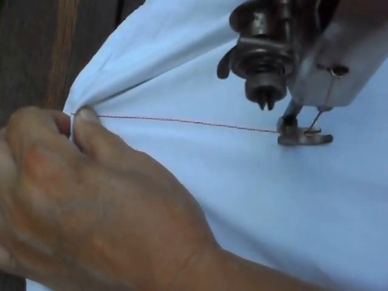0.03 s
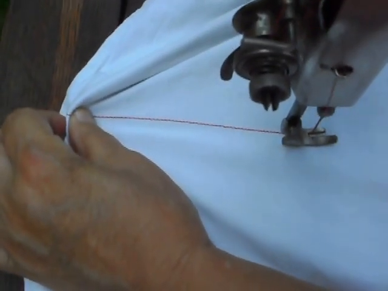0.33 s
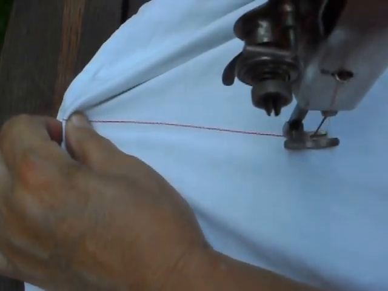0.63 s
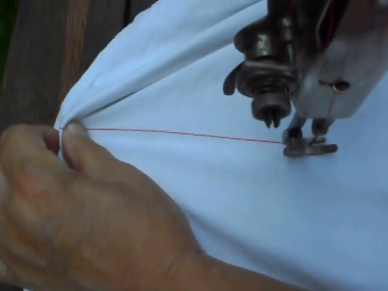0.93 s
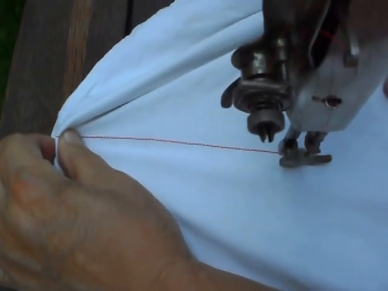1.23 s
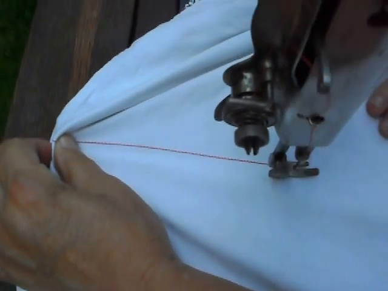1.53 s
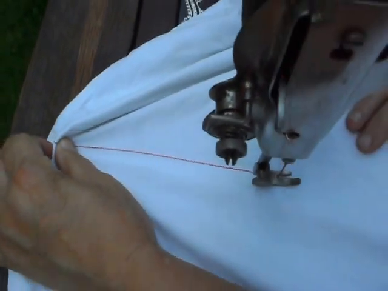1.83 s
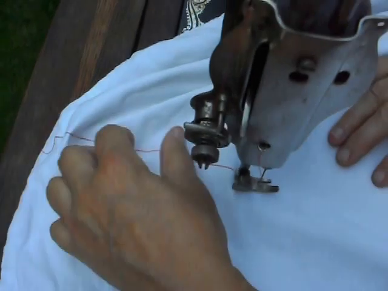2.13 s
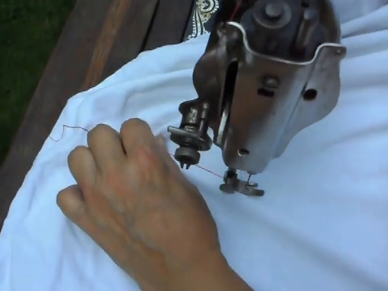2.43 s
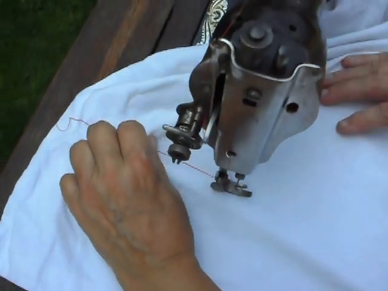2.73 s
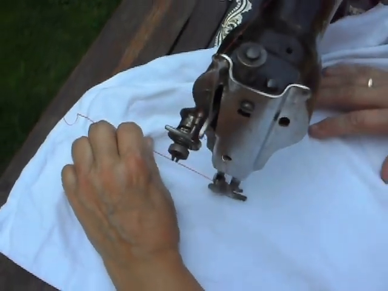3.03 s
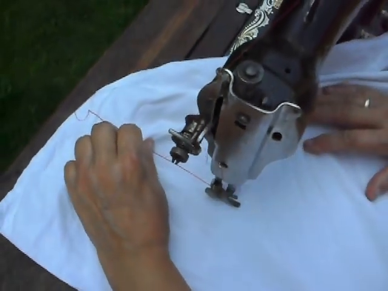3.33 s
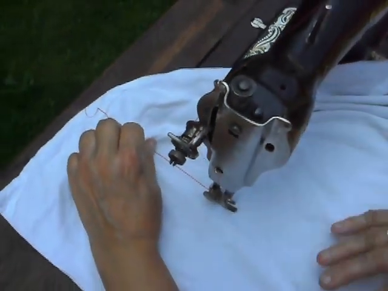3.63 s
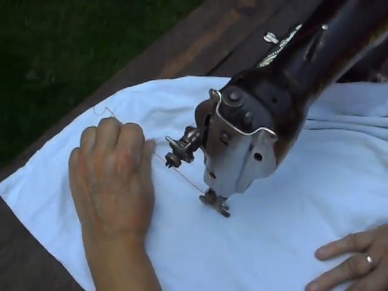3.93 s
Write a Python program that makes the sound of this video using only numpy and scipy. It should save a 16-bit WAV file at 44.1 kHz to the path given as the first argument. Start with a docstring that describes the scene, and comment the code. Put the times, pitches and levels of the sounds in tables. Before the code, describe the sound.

An old sewing machine stitches with a rapid metallic clatter, easing off a little.

```python
"""An old sewing machine stitches about seven times a second on a wooden garden table, easing off a little.
In each turn the shuttle scrapes and rattles on steel, the table top thumps, and the needle bar stops
with a hard clack that rings the cast frame. Loose joints tick in between and the bearings whirr below.
A few hollow knocks and a dull drag come as the cloth is guided, and air rumbles on the microphone."""
import sys
import numpy as np
from scipy import signal
from scipy.fft import rfft, irfft
from scipy.io import wavfile
from scipy.ndimage import uniform_filter1d

SR = 44100
rng = np.random.default_rng(int(sys.argv[2]) if len(sys.argv) > 2 else 0)


def log_audio(samples):
    """Write samples as a 16-bit WAV file to the path given in sys.argv[1]."""
    # one column per channel
    frames = np.atleast_2d(samples).T
    # limit to full scale, then quantise
    limited = np.clip(frames, -1, 1)
    pcm = np.round(limited * 32767).astype(np.int16)
    wavfile.write(sys.argv[1], SR, pcm)


N = 176400

# one row per stitch: (clack time [s], clack level [dB], rattle time [s], rattle level [dB], thump [dB])
STITCHES = [(0.0623, -38.5, 0.01, -40, -36.7), (0.1966, -38, 0.151, -39.5, -33),
            (0.34, -38, 0.285, -40.5, -34.5), (0.4914, -38.5, 0.436, -40, -35.5),
            (0.6409, -39.5, 0.586, -40.5, -36.5), (0.802, -40.5, 0.746, -40.5, -36),
            (0.941, -39, 0.894, -40, -33.5), (1.0695, -40, 1.022, -38, -34),
            (1.2093, -40.5, 1.159, -39, -34.5), (1.342, -40.5, 1.295, -40, -31.5),
            (1.484, -42, 1.433, -38.5, -35), (1.634, -41, 1.584, -40.5, -37),
            (1.769, -40, 1.721, -39.5, -33.5), (1.9106, -42, 1.863, -42.5, -34.5),
            (2.0576, -42, 2.006, -40.5, -33.5), (2.201, -44.5, 2.149, -41.5, -33.5),
            (2.36, -44, 2.304, -44.5, -36), (2.507, -42, 2.458, -43.5, -36.5),
            (2.6584, -45.5, 2.609, -47.5, -36.5), (2.819, -44.5, 2.766, -47.5, -38.5),
            (2.9737, -45, 2.924, -48.5, -37), (3.1443, -46, 3.084, -49.5, -37),
            (3.3103, -43, 3.259, -52, -37), (3.4538, -42, 3.404, -47, -36.5),
            (3.6104, -45.5, 3.558, -49, -38), (3.7649, -45, 3.716, -50.5, -39),
            (3.923, -45, 3.87, -50.5, -38)]
# modes of the cast frame: (frequency [Hz], level [dB], t60 [s])
FRAME_MODES = [(254, 1.5, 0.11), (299, 3, 0.047), (325.8, 2, 0.16), (413, -1.5, 0.086), (533, -2, 0.14),
               (562, -6, 0.2), (690, -13.5, 0.17), (794, -4.5, 0.037)]
# bright tone of rattling metal: (frequency [Hz], level [dB])
RATTLE_TONE = [(290, -51), (500, -15), (718, -18), (1220, -1), (1610, -11.5), (1730, -17.5), (2070, -0.5),
               (2520, -3), (2740, -2), (3940, -5.5), (4650, 0.5), (6500, -5.5), (7580, -6.5), (10300, -12),
               (11200, -19.5), (12200, -12.5), (14000, -32)]
NOMINAL_TURN_S = .145


def needle_clacks():
    """One hard stop per turn: a crack with two quick bounces, then the needle bar and the frame ring."""
    # tone of the stop: (frequency [Hz], level [dB])
    clack_tone = [(210, -23), (350, -30), (408, 8), (639, 2), (925, -2), (1180, 2.5), (1610, -6),
                  (1970, -5.5), (2340, -3), (2640, 2.5), (2900, -5.5), (3600, -10.5), (4200, -7),
                  (4900, -7), (5900, -8.5), (6470, -12), (8280, -21.5), (12200, -36), (14000, -55)]
    # modes of the needle bar and its guide: (frequency [Hz], level [dB], t60 [s])
    bar_modes = [(722, -2, 0.043), (927, -0.5, 0.031), (1187, 4, 0.031), (1573, 2.5, 0.027),
                 (1724, -5, 0.041), (2160, -5, 0.017), (2710, -4, 0.018)]
    t60_s, bounce_s, bounce_db, rebound_s = .022, .001677, -5, .0042
    out = np.zeros(N)
    common_ring = unit(body(clack_tone, t60_s, slope=.32))
    impulse = signal.unit_impulse(len(common_ring))
    crack = unit(signal.lfilter(*signal.butter(1, 2200, "high", fs=SR), colour(impulse, clack_tone)))
    for (at, db, *_), turn in zip(STITCHES, turn_lengths()):
        ring = common_ring + amp(-1) * unit(body(clack_tone, t60_s, slope=1)) + amp(-5) * crack
        hit = amp(-12) * unit(chatter(.003, per_s=3000))
        hit[0] += 1
        for k in (1, 2):
            hit[int(k * bounce_s * SR * rng.uniform(.7, 1.3))] += amp(k * bounce_db)
        add(out, at, signal.fftconvolve(hit, ring), db)
        # the bar strikes and rebounds twice, harder as the machine slows
        bar_db = (db - 42.5) / 2 - 5  # follows half of the clack's change in level
        rebound_db = min(-5.5 + 18 * np.log2(turn / NOMINAL_TURN_S), 0)
        for k in range(3):
            bar = modes(bar_modes, scatter_db=1.5, detune=.013)
            add(out, at + .00106 + k * rebound_s, bar, bar_db + k * rebound_db)
        add(out, at + .00312, modes(FRAME_MODES, scatter_db=4, detune=.012), db - 9.5)
    return out


def shuttle():
    """The shuttle scrapes, draws the thread, rattles with three sharp catches and jolts the frame."""
    # tone of the sliding scrape: (frequency [Hz], level [dB])
    scrape_tone = [(240, -49.5), (400, 9.5), (867, -6), (1260, -5), (1800, 1), (2730, 4), (3670, -11),
                   (4010, 1), (4590, 3), (5910, -5.5), (8830, -12), (10900, -24), (12600, -41),
                   (14000, -51)]
    # steel parts rung by the rattle: (frequency [Hz], level [dB], t60 [s])
    steel_modes = [(2053, -5.5, 0.079), (2375, -12, 0.042), (2720, -11, 0.11), (4643, -5, 0.045),
                   (5440, -3.5, 0.037), (5685, 1.5, 0.011), (7280, -14, 0.031), (7460, 2, 0.017),
                   (9220, -5, 0.018), (10070, -19, 0.012)]
    thread_s = .0091
    out = np.zeros(N)
    scrape_ring = body(scrape_tone, t60=.029)
    rattle_ring = unit(body(RATTLE_TONE, t60=.017))
    for (_, clack_db, at, db, thump_db), turn in zip(STITCHES, turn_lengths()):
        rattle_s = .0165 * 2 ** ((db + 40) / 14)  # 14 dB louder lasts twice as long
        onset = at - rattle_s / 2
        steel = rattle_ring + amp(-5) * modes(steel_modes, scatter_db=2, detune=.0069, size=4096)
        contacts = unit(chatter(rattle_s, per_s=2200, spread_db=3, edge=.25))
        for catch in rng.uniform([0, .3, .65], [.05, .55, .9]):
            contacts[int(rattle_s * SR * catch)] += amp(-7)
        add(out, onset - .001, signal.fftconvolve(contacts, steel), db + 3.5)

        scrape = chatter(.009, per_s=2500, spread_db=3.5, edge=.092)
        scrape_at = at - .029 * turn / NOMINAL_TURN_S
        add(out, scrape_at, signal.fftconvolve(scrape, scrape_ring), (db + clack_db) / 2 - 4.5)

        thread = chatter(thread_s, per_s=1800, spread_db=2.5)
        add(out, onset - thread_s - .003, signal.fftconvolve(thread, rattle_ring), db - 10.5)

        shudder = chatter(.0232, per_s=700)
        frame = modes(FRAME_MODES, scatter_db=0, detune=.029)
        add(out, at - .00903, signal.fftconvolve(shudder, frame), thump_db - 9.5)
    return out


def linkage():
    """Loose joints tick at the same points of every turn, with an occasional stray snap."""
    # play in the joints: (position after the clack [turns], level against the clack [dB], length [s])
    ticks = [(0.185, -10, 0.0068), (0.27, -8.5, 0.0078), (0.833, -11, 0.006), (0.906, -13.5, 0.0072)]
    # tone of a tick: (frequency [Hz], level [dB])
    tick_tone = [(240, -24), (400, -13.5), (663, -6.5), (2150, -9), (3900, -30), (4730, -16), (5240, -20),
                 (6560, -24), (7610, -18.5), (8570, -36), (9650, -31), (12400, -36), (14000, -38)]
    # stray snaps: (time [s], level [dB], length [s])
    snaps = [(0.372, -52, 0.0088), (0.965, -46.5, .004)]
    t60_s, jitter_s = .016, .0008
    out, turns = np.zeros(N), turn_lengths()
    next_turns = np.append(turns[1:], turns[-1])
    for at, db, length in snaps:
        snap = chatter(length, per_s=2000, edge=.1)
        add(out, at, signal.fftconvolve(snap, body(RATTLE_TONE, t60_s)), db)
    for position, db, length in ticks:
        ring = body(tick_tone, t60_s, slope=.71)
        for (clack_s, clack_db, *_), turn in zip(STITCHES, next_turns):
            at = clack_s + position * turn + jitter_s * rng.standard_normal()
            contacts = unit(chatter(length, per_s=1500, spread_db=8))
            contacts[0] += amp(-1.5)  # hard attack
            add(out, at, signal.fftconvolve(contacts, ring), clack_db + db)
    return out


def table_thumps():
    """Each needle stroke pushes the table top; its two close lowest modes make the thump swell and beat."""
    # modes of the wooden top: (frequency [Hz], level [dB], t60 [s])
    wood_modes = [(154, 3, 0.23), (171.7, 1.5, 0.38), (193.8, -14, 0.45), (258.6, -10.5, 0.26),
                  (340, -18, 0.18), (423, -10.5, 0.12)]
    lead_s, attack_s = .0225, .00045
    out, t = np.zeros(N), np.arange(SR // 4) / SR
    for clack_s, _, rattle_s, _, db in STITCHES:
        tuning = 1 + .015 * rng.standard_normal()  # the modes shift together, so each thump beats alike
        ring = 0
        for k, (hz, mode_db, t60) in enumerate(wood_modes):
            gain = (-1) ** k * amp(mode_db + rng.standard_normal())
            ring += gain * np.sin(2 * np.pi * hz * tuning * t) * decay(t, t60)
        at = (clack_s + rattle_s) / 2 - lead_s
        add(out, at, ring * (1 - np.exp(-t / attack_s)), db + 5.5)
    return out


def table_knocks():
    """Dull, hollow knocks on the table while the cloth is guided."""
    # stray knocks: (time [s], level [dB], pitch [Hz], t60 [s])
    knocks = [(.3675, -27.5, 520, 0.092), (1.02, -42, 408, 0.075), (1.045, -47, 326, 0.086),
              (1.077, -35, 416.6, 0.23), (1.096, -43.5, 404, 0.055), (1.134, -35, 754, 0.064),
              (1.164, -43, 503, 0.04)]
    # partials of a knock: (frequency [ratio to the pitch], level [dB])
    partials = [(1, 5), (1.13, -3), (1.65, -14.5), (2.68, -10.5), (4.1, -16)]
    attack_s = .00049
    out, t = np.zeros(N), np.arange(SR // 5) / SR
    for at, db, hz, t60 in knocks:
        ring = sum(amp(partial_db) * np.sin(2 * np.pi * (hz * ratio * t + rng.random()))
                   for ratio, partial_db in partials)
        add(out, at, ring * decay(t, t60) * (1 - np.exp(-t / attack_s)), db)
    return out


def cloth_drag():
    """The cloth is shoved along once and bumps dully over the wood."""
    # tone of cloth on wood: (frequency [Hz], level [dB])
    drag_tone = [(60, 7), (110, 3.5), (250, -2), (450, -4), (800, -12), (1400, -37), (4000, -50)]
    out = np.zeros(N)
    bumps = chatter(.23, per_s=300, spread_db=2.5, size=SR // 2)
    add(out, at_s=1.0, sound=colour(bumps, drag_tone), db=-28.5)
    return out


def bearing_whirr():
    """Bearings and gears rub with a fine grain that swells and sinks with the load in each turn."""
    # tone of the rub: (frequency [Hz], level [dB])
    rub_tone = [(120, -13), (200, -4), (320, -8), (560, -11), (800, -11), (1030, -16), (1200, -15),
                (1700, -21), (2100, -19), (3300, -23), (5300, -25), (7800, -30), (10000, -34), (12500, -74)]
    # load through one turn: (position after the clack [turns], level [dB])
    turn_load = [(.03, -1), (.14, -3), (.21, -1), (.39, -4.5), (.5, 1.5), (.8, 0)]
    # overall envelope: (time [s], level [dB])
    envelope = [(0, -44.5), (.8, -46), (1.1, -43.5), (1.45, -45.5), (2.4, -47), (4, -48.5)]
    t, clack_s = np.arange(N) / SR, np.array(STITCHES)[:, 0]
    # one more turn at each end keeps the pulse going
    clack_s = np.r_[2 * clack_s[0] - clack_s[1], clack_s, 2 * clack_s[-1] - clack_s[-2]]
    turns_done = np.interp(t, clack_s, np.arange(len(clack_s)))
    load_db = np.interp(turns_done, *np.array(turn_load).T, period=1)
    grains = (rng.random(N) < 3000 / SR) * rng.standard_normal(N)
    friction = unit(grains) + unit(rng.standard_normal(N))
    friction *= amp(load_db + 1.6 * wander(per_s=140))
    rub = signal.fftconvolve(friction, body(rub_tone, t60=.0066))[:N]
    return rub / rub.std() * amp(np.interp(t, *np.array(envelope).T))


def air_rumble():
    """Moving air rumbles on the microphone, with four low puffs."""
    # tone of the rumble: (frequency [Hz], level [dB])
    air_tone = [(12, -2.5), (28, 9), (44, -1.5), (70, -14), (110, -13), (200, -9.5), (400, -52.5)]
    # gusts: (time [s], level [dB])
    gusts = [(0, -42.5), (.7, -41.5), (1.0, -35.5), (1.3, -40.5), (1.6, -45), (1.9, -38), (2.45, -45.5),
             (2.8, -38), (3.2, -40), (4, -42.5)]
    # single pressure swings: (time [s], peak level [dB], frequency [Hz])
    puffs = [(0.982, -32, 27), (1.323, -35.5, 90), (2.71, -25, 41.4), (2.885, -39, 53.7)]
    t = np.arange(N) / SR
    rumble = colour(rng.standard_normal(N), air_tone)
    out = rumble / rumble.std() * amp(np.interp(t, *np.array(gusts).T))
    for at, db, hz in puffs:
        phase = 2 * np.pi * hz * (t - at)
        out += amp(db) * phase * np.exp((1 - phase ** 2) / 2)
    return out


def turn_lengths():
    """Seconds taken by the turn that ends with each clack."""
    gaps = np.diff(np.array(STITCHES)[:, 0])
    return np.append(gaps[0], gaps)


def chatter(length_s, per_s, spread_db=4, edge=.54, size=4096):
    """A run of tiny contacts that swells and fades; a small edge starts and stops it abruptly."""
    progress = np.minimum(np.arange(size) / SR / length_s, 1)
    contacts = (rng.random(size) < per_s / SR) + .018  # faint friction between the contacts
    swell = (progress * (1 - progress)) ** edge
    return contacts * rng.choice([-1, 1], size) * amp(spread_db * rng.standard_normal(size)) * swell


def modes(rows, scatter_db, detune, size=6000):
    """Damped sines from (frequency [Hz], level [dB], t60 [s]) rows, a little different at every blow."""
    t, out = np.arange(size) / SR, 0
    for hz, db, t60 in rows:
        sharp, louder = rng.standard_normal(2)
        gain = rng.choice([-1, 1]) * amp(db + scatter_db * louder)
        out += gain * np.sin(2 * np.pi * hz * (1 + detune * sharp) * t) * decay(t, t60)
    return unit(out)


def body(tone, t60, slope=.54, size=4096):
    """Ring of a part with many close modes; t60 holds at 2 kHz and the low modes last longer."""
    t, f = np.arange(size) / SR, np.arange(size // 2 + 1) * SR / size
    ring = 0
    for hz in 250 * 2 ** (np.arange(13) / 2):  # half-octave bands
        band = np.sqrt(np.maximum(1 - 2 * np.abs(np.log2((f + 1) / hz)), 0))
        noise = irfft(band * np.exp(2j * np.pi * rng.random(len(f))))
        ring += np.sqrt(hz) * unit(noise * decay(t, t60 * (2000 / hz) ** slope))
    spectrum = rfft(ring)
    flattened = irfft(spectrum / np.sqrt(uniform_filter1d(np.abs(spectrum) ** 2, size=31) + 1e-3))
    fade_out = np.minimum(2 - 2 * t / t[-1], 1) ** 2
    return colour(flattened * fade_out, tone)


def colour(x, tone, size=16384):
    """Minimum-phase EQ through (frequency [Hz], level [dB]) points, falling away below the lowest."""
    hz, db = np.array(tone, float).T
    f = np.maximum(np.arange(size // 2 + 1) * SR / size, 1)
    curve_db = np.interp(np.log(f), np.log(hz), db) + 20 * np.log10(np.minimum(f / hz[0], 1))
    cepstrum = irfft(np.log(amp(curve_db)))
    cepstrum[1:size // 2] *= 2
    cepstrum[size // 2 + 1:] = 0
    return signal.fftconvolve(x, irfft(np.exp(rfft(cepstrum))))[:len(x)]


def wander(per_s):
    """Smooth random motion with a spread of 1."""
    hold = int(SR / per_s)
    steps = np.repeat(rng.standard_normal(N // hold + 1), hold)[:N]
    smooth = uniform_filter1d(steps, hold)
    return smooth / smooth.std()


def add(out, at_s, sound, db):
    """Mix in a short sound with the energy of that level held for 12 ms."""
    start = int(at_s * SR)
    sound = (unit(sound) * amp(db) * np.sqrt(.012 * SR))[max(-start, 0):]
    part = out[max(start, 0):][:len(sound)]
    part += sound[:len(part)]


def decay(t, t60):
    """Envelope that falls 60 dB in t60 seconds."""
    return np.exp(-np.log(1000) * t / t60)


def amp(db):
    """Decibels to gain."""
    return 10 ** (np.asarray(db) / 20)


def unit(x):
    """Scale to unit energy."""
    return x / np.sqrt(np.sum(x ** 2) + 1e-18)


def scene():
    """The machine on its table, close by in the open air, in mono."""
    machine = needle_clacks() + shuttle() + linkage()
    table_top = table_thumps() + table_knocks() + cloth_drag()
    return (machine + table_top + bearing_whirr() + air_rumble())[None]


def record(dry):
    """The top end has a narrow dip near 11 kHz, falls away above 12 kHz and is cut at 13.6 kHz."""
    # shape of the top end: (frequency [Hz], level [dB])
    treble_tone = [(5, -0.5), (10300, 1), (11050, -5.5), (11700, 0.5), (12600, -10), (14000, -14)]
    heard = colour(dry[0], treble_tone)[None]
    return signal.sosfilt(signal.ellip(8, .2, 70, 13600, fs=SR, output="sos"), heard)


dry = scene()
out = record(dry)
log_audio(out)
```